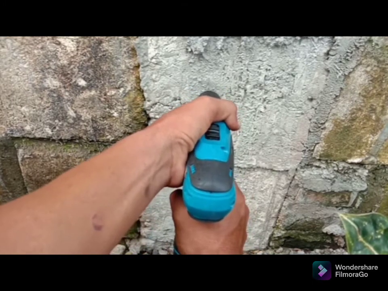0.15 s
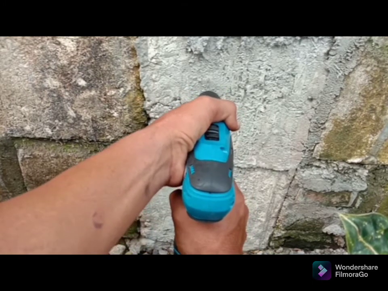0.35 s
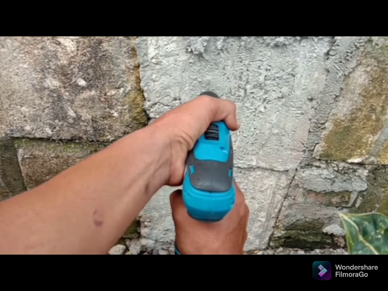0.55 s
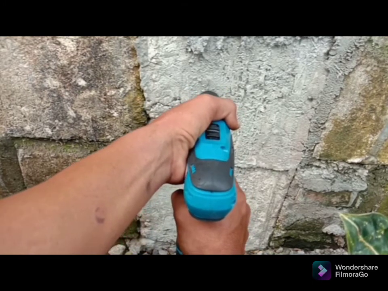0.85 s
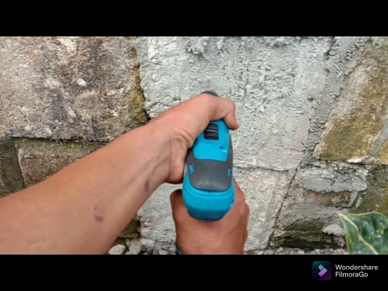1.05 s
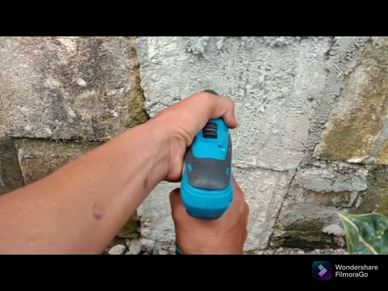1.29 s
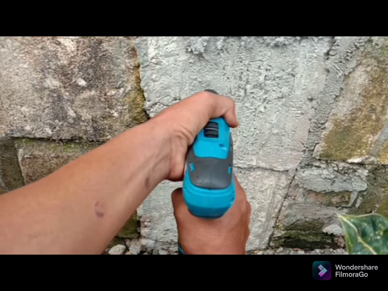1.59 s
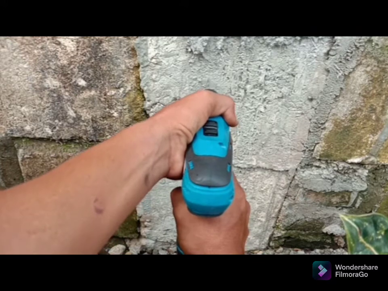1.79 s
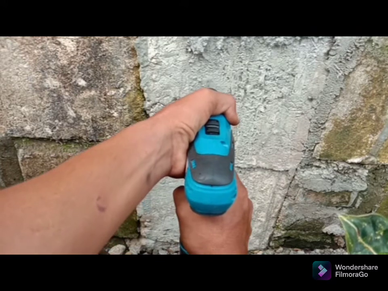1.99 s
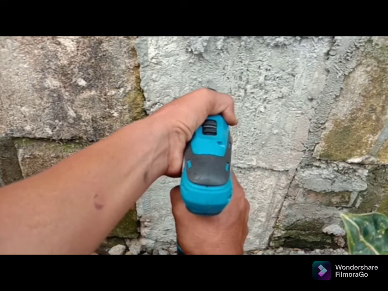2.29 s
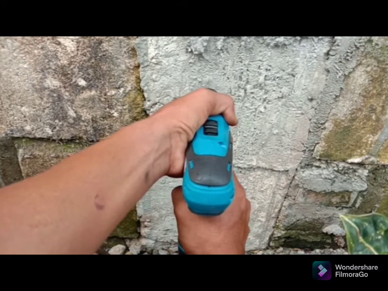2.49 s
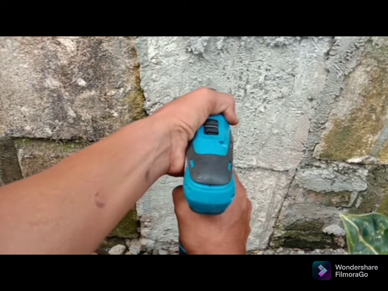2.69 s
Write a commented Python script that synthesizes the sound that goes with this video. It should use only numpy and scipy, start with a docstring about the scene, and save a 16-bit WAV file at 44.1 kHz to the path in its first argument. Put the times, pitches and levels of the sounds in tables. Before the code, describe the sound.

Cordless drill boring into concrete up close, with a high whine, gritty scraping and squeaks.

```python
"""Cordless drill into concrete

A drill spins up and bores into concrete, close to a small microphone. The motor and its planet gears
whine on fixed multiples of the shaft speed over the rattle of the housing. The bit scrapes, cracks grit,
squeaks as it rubs once a turn, and jolts the tool with dull thumps."""
import sys
import numpy as np
from scipy import signal
from scipy.fft import rfft, irfft, next_fast_len
from scipy.io import wavfile
from scipy.ndimage import uniform_filter1d, map_coordinates

SR = 44100
rng = np.random.default_rng(int(sys.argv[2]) if len(sys.argv) > 2 else 0)


def dump(signal):
    """Clip the signal to [-1, 1] and save it as 16-bit WAV at the path in sys.argv[1]."""
    limited = np.clip(np.atleast_2d(signal).T, -1, 1)
    pcm = np.round(limited * 32767).astype(np.int16)
    wavfile.write(sys.argv[1], SR, pcm)


N = 125685

GEARING = 15  # motor turns for each turn of the bit
# The motor spins up, then sags a little under load: (time [s], shaft speed [turns/s])
MOTOR_SPEED = [(0, 204), (.012, 221), (.036, 264), (.06, 296), (.085, 318), (.11, 332), (.15, 342.5),
               (.22, 350.5), (.33, 354.6), (.55, 349.6), (1.3, 350.6), (1.45, 345), (1.8, 337.5),
               (2.0, 341), (2.1, 336.5), (2.26, 339.6), (2.6, 340.2), (2.69, 345.3), (2.85, 341)]
# How hard the bit is pressed in: (time [s], load [0-1])
BIT_LOAD = [(0, 0), (1.2, 0.08), (1.7, .9), (2.85, 1)]
# Fader moves of the noise layers: (time [s], housing [dB], grinding [dB], treble [dB], rumble [dB])
FADERS = [(0.0, -21.5, -26, -37.5, -46), (0.22, -21.5, -24, -34.5, -39.5), (0.44, -21, -25, -37, -41.5),
          (0.67, -21, -24, -35, -40.5), (0.83, -20.5, -23.5, -34.5, -41.5), (1.31, -19.5, -25, -35, -45),
          (1.59, -21, -25.5, -35.5, -46.5), (1.78, -22, -26, -36.5, -47.5),
          (1.97, -20.5, -25.5, -35, -44.5), (2.36, -19.5, -26, -36, -48.5),
          (2.53, -19.5, -25.5, -36.5, -59), (2.85, -19, -26, -38.5, -57)]


def amp(db):
    return 10 ** (np.asarray(db) / 20)


def unit_rms(x):
    return x / np.sqrt(np.mean(x ** 2) + 1e-20)


def curves(rows):
    """One value per sample for each column after the time."""
    times, *columns = np.transpose(rows)
    return [np.interp(np.arange(N) / SR, times, column) for column in columns]


def wobble(rate):
    """A smooth random curve with `rate` knots a second."""
    return map_coordinates(rng.standard_normal(int(N * 400 / SR)), [np.arange(N) * rate / SR])


def filtered(x, response):
    """x shaped by a complex frequency response."""
    size = next_fast_len(N + SR // 2)
    return irfft(rfft(x, size) * response(np.fft.rfftfreq(size, 1 / SR)), size)[..., :N]


def rush(colour, grit_db, patchy_db):
    """Gritty noise of rms 1 in a given colour, with random patches of gain over time and frequency."""
    noise = rng.standard_normal(N) * amp(grit_db * wobble(300))
    frames = signal.stft(noise, nperseg=256)[2]
    patches = uniform_filter1d(uniform_filter1d(rng.standard_normal(frames.shape), 4, 0), 10, 1)
    patchy = signal.istft(frames * amp(patchy_db * unit_rms(patches)), nperseg=256)[1][:N]
    knots_hz, db = np.transpose(colour)
    return unit_rms(filtered(patchy, lambda hz: amp(np.interp(np.log(hz + 1), np.log(knots_hz + 1), db))))


def motor_turns():
    """Running count of motor shaft turns."""
    return np.cumsum(curves(MOTOR_SPEED)[0]) / SR


def boring():
    """The bit's uneven bite shakes the housing ring, grinding and treble, over a wavering rumble."""
    # Housing resonances, at a light touch and under load: (frequency [Hz], relative level [dB])
    ring_light = [(2940, -44), (5000, -30), (5340, -9.5), (6150, 5.5), (6490, -8.5), (6670, -4.5),
                  (7450, -4.5), (7730, -14), (8600, -23.5), (11200, -89), (18900, -120)]
    ring_loaded = [(2940, -32.5), (5000, -34), (5340, -12), (6040, 2), (6350, -2), (6670, -10.5),
                   (7420, -8), (7780, -15.5), (8140, -52), (8600, -35), (11200, -30), (18900, -120)]
    # Bit scraping concrete, at a light touch and under load: (frequency [Hz], relative level [dB])
    grind_light = [(530, -45), (900, -30.5), (1110, -25), (1250, -7.5), (1520, -14.5), (1770, -6),
                   (2020, -14), (2850, -9.5), (3070, -8.5), (3190, -6), (3440, -8), (3710, -2),
                   (4000, -1.5), (5500, -2.5), (7150, -16), (12100, -120)]
    grind_loaded = [(530, -75), (900, -35), (1000, -19.5), (1090, -27), (1160, -14.5), (1270, -8.5),
                    (1560, -12), (2340, -12.5), (2680, -16.5), (3120, -7), (3390, -8.5), (3970, -2),
                    (4980, -4), (5500, -3.5), (7150, -21), (12100, -120)]
    # Sizzle on top and rumble underneath: (frequency [Hz], relative level [dB])
    treble_colour = [(4710, -55), (8000, 1), (8350, -5), (9080, -2), (10300, -11.5), (11300, -13.5),
                     (12400, -20), (13400, -17.5), (14900, 2), (15700, -5.5)]
    rumble_colour = [(15, -47), (25, -3), (102, 5.5), (219, -9), (335, -1.5), (419, -3), (827, -8.5),
                     (1100, -8), (1430, -25), (2420, -120)]
    ring_db, grind_db, treble_db, rumble_db = curves(FADERS)
    load = curves(BIT_LOAD)[0]
    light, heavy = np.sqrt(1 - load), np.sqrt(load)  # equal-power crossfade
    once_a_turn = np.cos(2 * np.pi * motor_turns() / GEARING + 3.4)
    bite_db = 0.27 * wobble(15) + 0.78 * wobble(39.73) + 0.26 * load * once_a_turn
    ring = light * rush(ring_light, grit_db=1.5, patchy_db=.4)
    ring += heavy * rush(ring_loaded, grit_db=1.5, patchy_db=.4)
    grind = light * rush(grind_light, grit_db=0.92, patchy_db=-0.75)
    grind += heavy * rush(grind_loaded, grit_db=-1.0, patchy_db=1.1)
    ring *= amp(ring_db - 1.62 + bite_db)
    grind *= amp(grind_db - 0.86 + 0.37 * bite_db)
    treble = amp(treble_db + 1.3 + 0.74 * bite_db) * rush(treble_colour, grit_db=1.96, patchy_db=1.0)
    rumble = amp(rumble_db - 2.0 + 3.1 * wobble(15)) * rush(rumble_colour, grit_db=1.5, patchy_db=-1.5)
    return ring + grind + treble + rumble


def motor_whine(spin_up_s=.11, housing_hz=6000, half_width_hz=250, resonance_db=12):
    """Unsteady motor and gear tones swell near the housing resonance and throb under load."""
    # Pitch of each tone: (multiple of the shaft speed)
    multiples = [1, 2, 3, 4, 25 / 3, 28 / 3, 31 / 3, 18, 19, 58 / 3, 62 / 3]
    # Voicing of each tone: (light-touch level [dB], loaded level [dB], spin-up gain [dB], throb [0-1])
    voicing = np.array([(-54, -57, -12, .4), (-62, -71, 0, .2), (-56, -58.5, 9, .4), (-59, -62, 3, .2),
               (-52, -54, 0, .5), (-38, -39.5, 3, .8), (-46, -54, 0, .5), (-34.5, -36, 1, .6),
               (-47, -58, 0, .5), (-37, -56, 9, .5), (-45, -54, 0, .5)])
    load, ring_db, speed = curves(BIT_LOAD)[0], curves(FADERS)[0], curves(MOTOR_SPEED)[0]
    turns = motor_turns()
    throb = load * np.cos(4 * np.pi * turns / GEARING + 0.83)  # twice for each turn of the bit
    spin_up = np.exp(-(np.arange(N) / SR / spin_up_s) ** 2)
    phase_jitter = (.012 + .022 * load) * wobble(110)
    tones = np.zeros(N)
    for multiple, (light_db, loaded_db, spin_up_db, depth) in zip(multiples, voicing):
        base_db = light_db + (loaded_db - light_db) * load + spin_up_db * spin_up
        swell_db = resonance_db / (1 + ((multiple * speed - housing_hz) / half_width_hz) ** 2)
        waver_db = (1.5 + 2 * load) * wobble(120)
        level = amp(base_db + swell_db + waver_db) * (1 + depth * throb)
        phase = 2 * np.pi * (multiple * turns + rng.random()) + multiple * phase_jitter
        tones += level * np.sqrt(2) * np.sin(phase)
    return tones * amp(ring_db - ring_db.mean())  # rides the housing fader


def rub(modes, length_s, fall):
    """One rub: a burst of narrow noise in each mode, sinking by the fraction `fall` of its pitch."""
    t = np.arange(1024) / SR
    hz = np.fft.fftfreq(len(t), 1 / SR)
    envelope = np.sin(np.pi * np.clip(t / length_s, 0, 1) ** 0.52)
    glide = t + fall * (t / 2 - t * t / (2 * length_s))
    burst = np.zeros(len(t))
    for pitch_hz, half_width_hz, db in modes:
        noise = np.exp(2j * np.pi * rng.random(len(t)))
        rough = np.fft.ifft(np.fft.fft(noise) / (1 + (hz / half_width_hz) ** 2))
        carrier = np.exp(2j * np.pi * pitch_hz * glide)
        squeal = (0.14 + rough / np.abs(rough).mean()) * carrier
        burst += amp(db) * unit_rms(squeal.real)
    return envelope * burst


def bit_squeaks():
    """The rubbing bit squeals with a crunch an octave below, and chirps in its high modes."""
    # Squeals, in runs about a turn apart: (time [s], relative level [dB], pitch [Hz], crunch [dB])
    squeals = [(1.1275, -12.5, 4440, -37), (1.1712, -14.5, 3700, -44), (1.4471, -14, 3680, -19.5),
               (1.489, -12.5, 4130, -19.5), (1.5298, -8.5, 4060, -49), (1.571, -11.5, 3970, -21.5),
               (1.6212, -11.5, 3830, -25.5), (1.6612, -12, 4180, -22), (1.6948, -11, 3920, -25),
               (1.75, -9, 4190, -22), (1.7978, -10, 4444, -16), (1.8484, -17, 3910, -29),
               (2.077, -12.5, 4620, -30), (2.1236, -16, 3780, -24), (2.1607, -21, 4230, -29),
               (2.241, -15.5, 4210, -23), (2.3366, -11, 4270, -43), (2.3795, -9, 4310, -35),
               (2.4268, -16, 4170, -34), (2.5137, -13, 4130, -33), (2.5577, -25, 4020, -55.5),
               (2.601, -18, 3800, -26)]
    # Bright chirps: (time [s], relative level [dB])
    chirps = [(0.8239, -38), (1.2804, -39), (1.3921, -21), (1.432, -31), (1.5133, -40), (1.5877, -45),
              (1.6655, -25), (1.7114, -40), (1.754, -21), (1.9319, -35), (2.0217, -33), (2.0656, -22),
              (2.1115, -22), (2.1609, -21), (2.248, -21), (2.2886, -24), (2.3375, -19), (2.3764, -20),
              (2.422, -17), (2.4697, -22.5), (2.5096, -37), (2.6687, -75)]
    # High modes of the bit: (frequency [Hz], half-width [Hz], relative level [dB])
    bit_modes = [(8620, 300, 3.5), (11730, 120, -6), (15440, 120, 9.5)]
    out = np.zeros(N + SR)
    for time_s, db, pitch_hz, crunch_db in squeals:
        modes = [(pitch_hz, 390, db - 11.5), (pitch_hz / 2, 300, crunch_db - 13)]
        out[round(time_s * SR):][:1024] += rub(modes, length_s=0.015, fall=0.11)
    for time_s, db in chirps:
        out[round(time_s * SR):][:1024] += amp(db - 19.5) * rub(bit_modes, length_s=0.0083, fall=0)
    return out[:N]


def thumps(delay_s=0.00776, push_t60_s=0.036, knock_hz=423, knock_t60_s=0.015):
    """Each jolt is a low push that rings a cycle or two, falling in pitch, led by a sharper knock."""
    # Jolts of the tool: (time [s], relative push level [dB], final pitch [Hz], knock level [dB])
    jolts = [(0.024, -38, 126, -33), (0.078, -32, 91.5, -42), (0.114, -33, 125, -46),
             (0.184, -37, 166, -36), (0.228, -31.5, 156, -38), (0.283, -41, 117, -35),
             (0.352, -35, 118, -34), (0.396, -46, 118, -48), (0.44, -36, 167, -35), (0.479, -29, 133, -26),
             (0.543, -24.5, 95, -24.5), (0.587, -31.5, 168, -49), (0.609, -32.5, 184, -64),
             (0.678, -32, 91.5, -38), (0.691, -32, 121, -42), (0.796, -41, 147, -42),
             (0.822, -31, 91.5, -25.5), (0.954, -33.5, 110, -35), (1.038, -37, 132, -45),
             (1.08, -40, 140, -31.5), (1.213, -45, 114, -31), (1.391, -31, 105, -39),
             (1.466, -29.5, 91.5, -30), (1.511, -29.5, 101, -47), (1.555, -32, 116, -32),
             (1.631, -33, 108, -30), (1.687, -23, 102, -40), (1.734, -37, 185, -42),
             (1.775, -28.5, 131, -36), (1.869, -31, 114, -36.5), (1.907, -37, 180, -37),
             (1.998, -56, 96.9, -42)]
    out, t = np.zeros(N + SR), np.arange(4096) / SR
    for time_s, push_db, pitch_hz, knock_db in jolts:
        cycles = pitch_hz * (t + 0.0021 * (1 - np.exp(-t / 0.0036)))
        push = amp(push_db + 3 - 60 * t / push_t60_s) * np.sin(2 * np.pi * cycles)
        detune = rng.uniform(0.73, 1.53)
        knock = amp(knock_db - 60 * t / knock_t60_s) * np.sin(2 * np.pi * knock_hz * detune * t)
        out[round((time_s + delay_s) * SR):][:len(t)] -= push + knock
    return out[:N]


def grit_chatter(grains_per_s=400, base_db=-30.5, centre_hz=3620):
    """Grit cracks under the tip: tiny pings at random times, swelling once for each turn of the bit."""
    samples = np.arange(128)
    when, tuning, strength = rng.random((int(grains_per_s * N / SR), 3)).T
    onsets = (when * (N - len(samples))).astype(int)
    swell_db = 3 * np.cos(2 * np.pi * motor_turns()[onsets] / GEARING + 2.97)
    level = amp(base_db + swell_db + 7.9 * strength)
    pitch_hz = centre_hz * np.exp(0.97 * (tuning - .5))
    cycles = np.outer(pitch_hz, samples / SR)
    envelope = np.exp(-cycles / 2.5) * (1 - np.exp(-cycles))
    grains = level[:, None] * envelope * np.sin(2 * np.pi * cycles)
    return np.bincount((onsets[:, None] + samples).ravel(), grains.ravel(), N)


def level_dips():
    """A gain that drops suddenly now and then and creeps back."""
    # Brief dips in level: (time [s], depth [dB], recovery time constant [s])
    dips = [(.262, -5.5, 0.024), (.35, -5, 0.023), (1.547, -2.5, .02), (1.813, -4, 0.17), (2.138, -4, 0.18),
            (2.27, -2, 0.018)]
    t, gain_db = np.arange(N) / SR, np.zeros(N)
    for time_s, depth_db, recovery_s in dips:
        gain_db += depth_db * (t > time_s) * np.exp(-np.abs(t - time_s) / recovery_s)
    return amp(uniform_filter1d(gain_db, size=200))


def scene():
    """The drill in mono: its running layers dip together, with squeaks and thumps on top."""
    running = motor_whine() + boring() + grit_chatter()
    return (running * level_dips() + bit_squeaks() + thumps())[None]


def record(dry):
    """The small microphone loses the deep bass; nothing passes above the band limit."""
    bass_cut_hz, top_hz = 86, 15600

    def response(hz):
        s = 1j * hz / bass_cut_hz
        high_pass = s ** 2 / (1 + 1.4 * s + s ** 2)
        return high_pass * (hz < top_hz)

    return filtered(dry, response)


dry = scene()
out = record(dry)
dump(out)
```